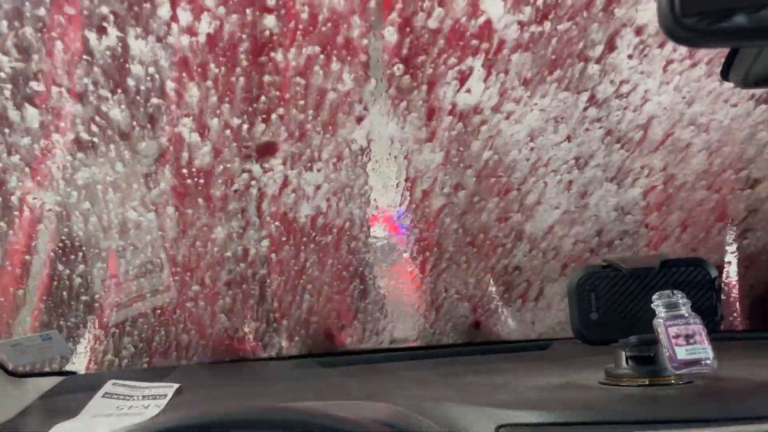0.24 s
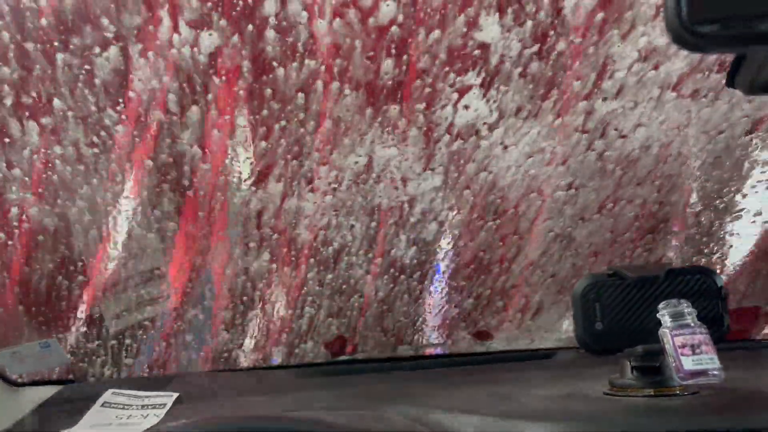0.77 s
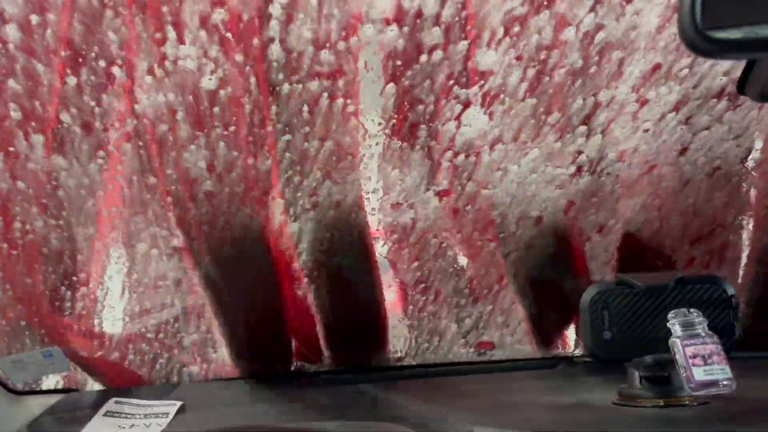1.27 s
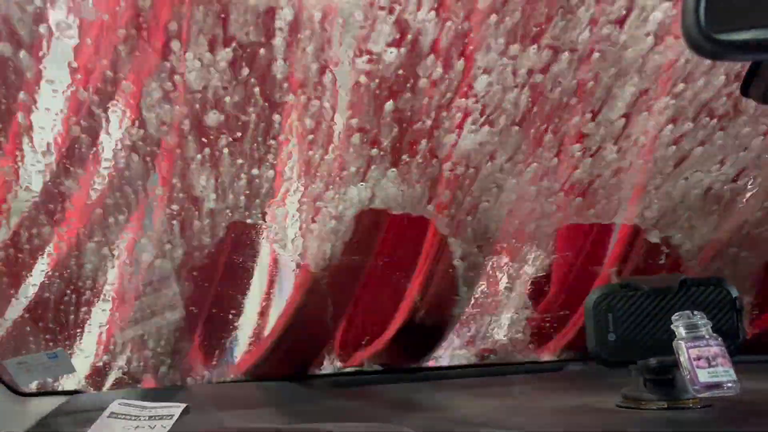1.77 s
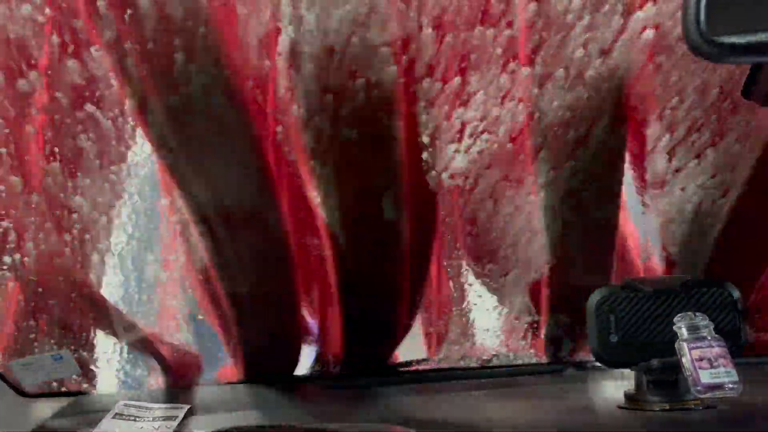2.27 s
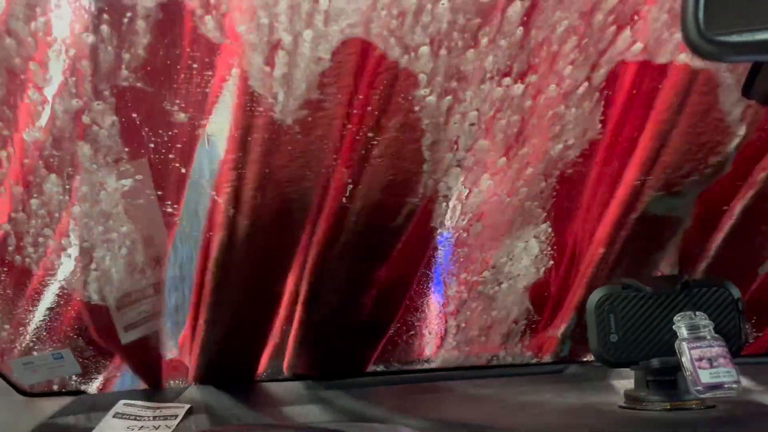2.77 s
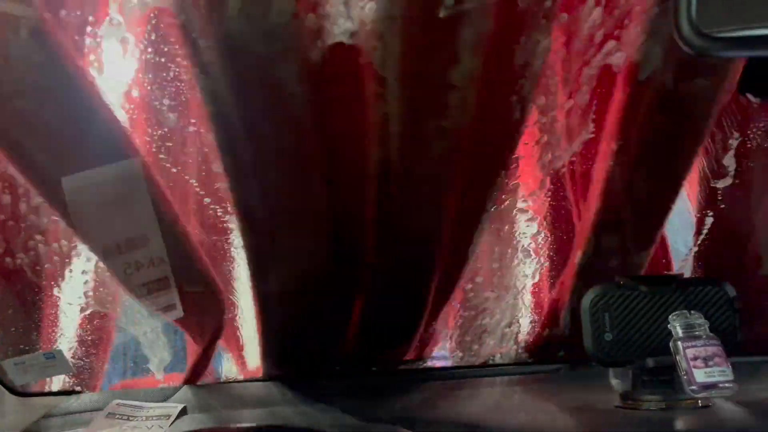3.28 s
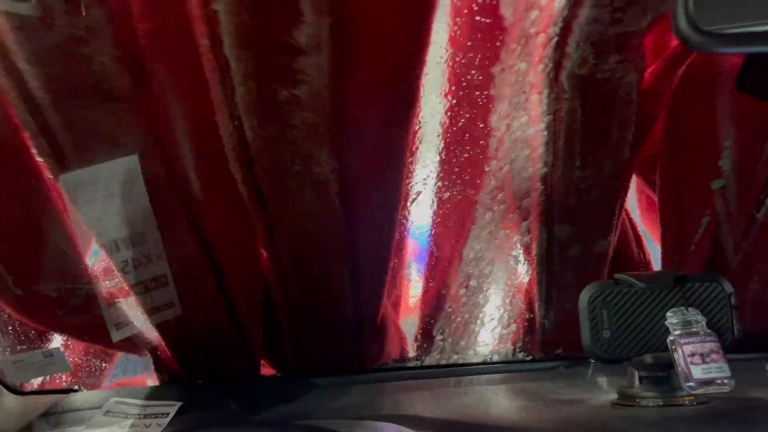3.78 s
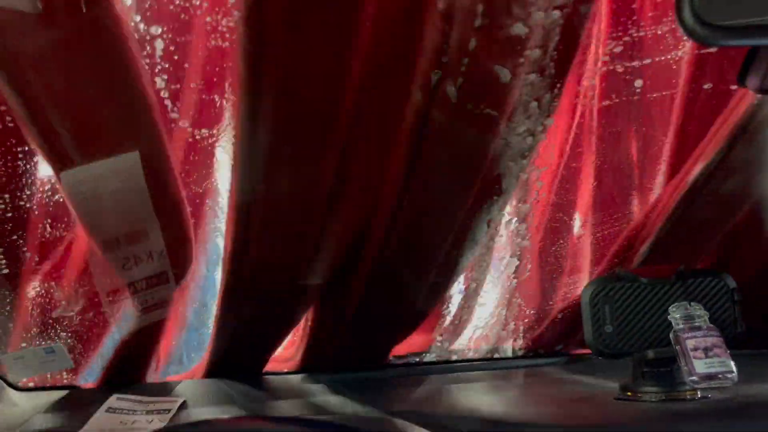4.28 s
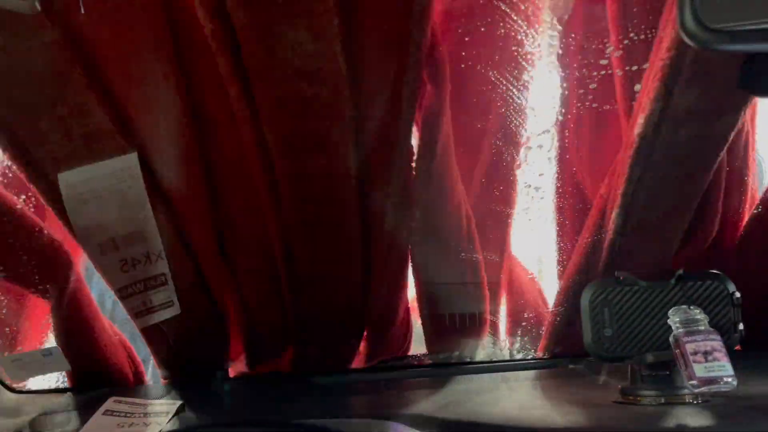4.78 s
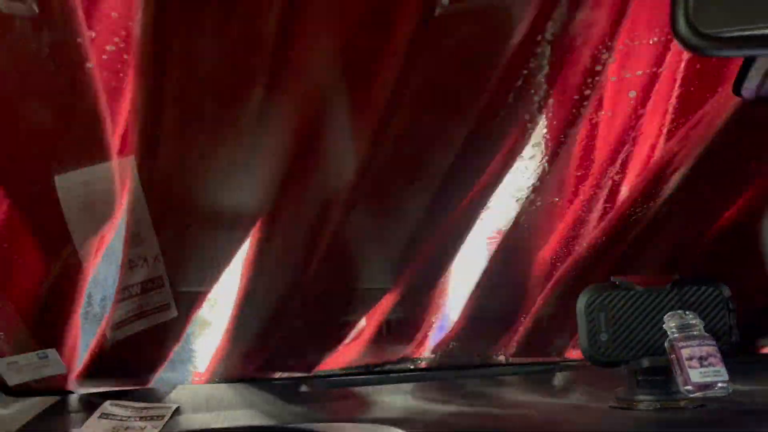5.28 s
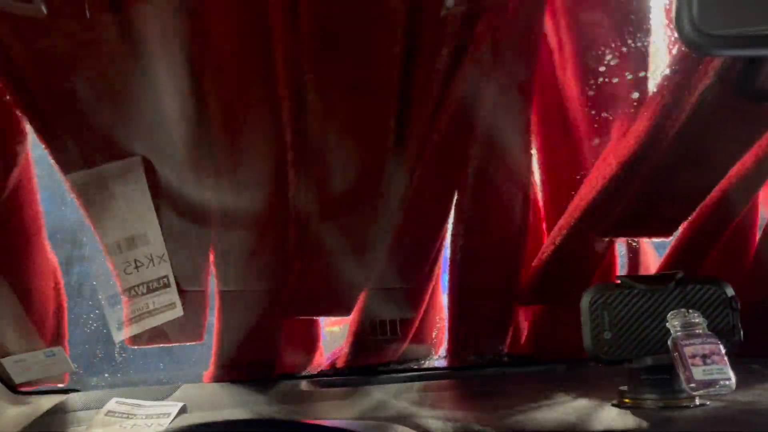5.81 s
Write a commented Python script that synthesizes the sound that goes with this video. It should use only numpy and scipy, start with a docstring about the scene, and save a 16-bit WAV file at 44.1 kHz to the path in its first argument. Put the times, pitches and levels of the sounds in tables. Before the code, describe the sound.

Inside a car in a wash, wet cloth strips slap and patter on the windscreen over deep body rumble, roof drumming and fading spray hiss.

```python
"""A rotating brush of wet cloth strips climbs from the bonnet over the windscreen, heard inside a car in a wash.
Soft random blows, filtered by the panels, make the body rumble and the roof drum; heavy bundles swing the metal.
Bursts of contacts with glass resonances make strip ends patter and slap; bundles of cloth crumple at their own pitch.
Water splashes in noise bursts, and the near spray hisses and moves away over the smooth hiss of far jets.
The bass is alike at both microphones, the treble comes from all round."""
import sys
import numpy as np
from scipy import signal
from scipy.fft import rfft, irfft
from scipy.io import wavfile
from scipy.ndimage import uniform_filter1d

SR = 44100
rng = np.random.default_rng(int(sys.argv[2]) if len(sys.argv) > 2 else 0)


def log_audio(samples):
    """Write samples as a 16-bit WAV file to the path given in sys.argv[1]."""
    # one column per channel
    frames = np.atleast_2d(samples).T
    # limit to full scale, then quantise
    limited = np.clip(frames, -1, 1)
    pcm = np.round(limited * 32767).astype(np.int16)
    wavfile.write(sys.argv[1], SR, pcm)


N = 266805
TIME = np.arange(N) / SR

# The brush climbs away from the body in surges, so both sink:
# (time [s], body rumble level [dB], level of cloth dragging on the bonnet [dB])
BODY_PRESS = [(0, -19.5, -32.5), (0.7, -18.5, -29), (1.6, -20, -33), (2.2, -23.5, -37.5),
              (2.72, -19.5, -28.5), (3.5, -24, -39), (4.3, -24, -31), (5.2, -29, -36.5), (5.65, -28.5, -27),
              (6.05, -29, -40)]
# Colour of cloth dragging on the bonnet: (frequency [Hz], level per Hz [dB])
BONNET_COLOUR = [(180, -20), (260, 1), (330, 1), (430, 2), (560, -4.5), (690, -3.5), (850, -11.5),
                 (1500, -19)]
# Windscreen resonances: (frequency [Hz], width [Hz], lift [dB])
GLASS_RESONANCES = [(854.5, 31, 12.5), (1012, 114, 10.5), (1784, 74, 7), (2370, 480, 4)]
# Colour of the cloth's snap, also of the ticking drops: (frequency [Hz], level per Hz [dB])
SNAP_COLOUR = [(700, -15), (1200, 3), (2600, -0.5), (3200, -3.5), (4600, -7), (6500, -29.5)]
# Colour of splashing water: (frequency [Hz], level per Hz [dB])
SPLASH_COLOUR = [(1900, 1), (4500, 0.5), (6500, -3.5), (9000, -4.5), (11000, -10)]
# Colour of the spray, near and far: (frequency [Hz], level per Hz [dB])
SPRAY_COLOUR = [(1200, 8.5), (2500, 7), (4000, 3.5), (5000, 2), (6000, 2), (7100, -0.5), (8700, 4.5),
                (9500, 0), (10500, -31)]


def undb(db):
    """Decibels to gain."""
    return 10 ** (np.asarray(db) / 20)


def unit(x):
    """Scale to an rms of 1."""
    return x / np.sqrt(np.mean(x ** 2))


def ride(times_s, levels_db):
    """Gain that follows a level curve, straight in dB between its points."""
    return undb(np.interp(TIME, times_s, levels_db))


def walk(rate):
    """Random levels held for 1 / rate seconds and smoothed twice; rms 1."""
    hold = int(SR / rate)
    steps = rng.standard_normal(1000)[np.arange(N) // hold % 1000]
    return unit(uniform_filter1d(uniform_filter1d(steps, hold), hold))


def bump(centre_s, width_s):
    """A smooth rise to 1 and back."""
    return np.exp(-((TIME - centre_s) / width_s) ** 2)


def fade(attack_s, t60):
    """Half a second of envelope: a quick rise, then an exponential decay."""
    t = TIME[:SR // 2]
    rise = 1 - np.exp(-(t / attack_s) ** 2)
    shape = rise * np.exp(-np.log(1000) * t / t60)
    return shape / shape.max()


def add(track, start_s, sound):
    """Lay a sound into a track."""
    i = max(int(start_s * SR), 0)
    track[..., i:i + sound.shape[-1]] += sound[..., :N - i]


def place(x, left_db):
    """Tilt the balance: positive makes the left louder than the right by this much."""
    return x * undb(np.array([[left_db], [-left_db]]) / 2)


def strength(x, db):
    """Scale a burst to the total energy of 14 ms at this level on two channels."""
    return x * undb(db) * np.sqrt(2 * .014 * SR) / np.linalg.norm(x)


def colour(x, points, modes=()):
    """Minimum-phase filter of unit power gain: a smooth (Hz, dB) slope with resonances on top."""
    size = 16384
    hz = np.maximum(np.arange(size // 2 + 1) * SR / size, 1)
    f, db = np.transpose(points)
    # outside the points the level falls 24 dB an octave, for two octaves at most
    octaves_below = np.maximum(np.log2(f[0] / hz), 0)
    octaves_above = np.maximum(np.log2(hz / f[-1]), 0)
    slope_db = np.interp(np.log(hz), np.log(f), db) - 24 * np.minimum(octaves_below + octaves_above, 2)
    for centre, width, lift in modes:
        slope_db = slope_db + lift / (1 + (2 * (hz - centre) / width) ** 2)
    # folding the cepstrum makes the filter causal
    cepstrum = irfft(np.log(undb(slope_db)))[:size // 2]
    cepstrum[1:] *= 2
    response = irfft(np.exp(rfft(cepstrum, size)))
    response /= np.linalg.norm(response)
    return signal.fftconvolve(x, response[None], axes=1)[:, :N]


def cabin(x, t60, direct):
    """The path from one spot to the two microphones: direct sound plus dense, short reflections."""
    size = 2048
    echoes = rng.standard_normal((2, size)) * fade(0.000053, t60)[:size]
    echoes /= np.linalg.norm(echoes, axis=1, keepdims=True)
    echoes[:, 0] += direct
    return signal.fftconvolve(x[None], echoes, axes=1)[:, :len(x)] / np.hypot(1, direct)


def blows(rate, scatter_db):
    """Contacts at random moments, rate a second on average, of uneven strength and random sign; rms 1."""
    lands = rng.random(N) < rate / SR
    size = undb(scatter_db * np.clip(rng.standard_normal(N), -2, 2))
    return unit(lands * size * rng.choice([-1, 1], N))


def contacts(rate, scatter_db, shared):
    """Tiny wet contacts spread over a surface; only a share of them reaches both microphones alike."""
    apart = np.array([blows(rate, scatter_db), blows(rate, scatter_db)])
    return unit(apart + shared * blows(rate, scatter_db))


def panel(points, rate, scatter_db, apart_hz, apart_db):
    """Soft blows on sheet metal; long waves reach both microphones alike, short ones do not."""
    common, apart = blows(rate, scatter_db), blows(rate, scatter_db)
    high_pass = signal.butter(1, apart_hz, "high", fs=SR, output="sos")
    apart = undb(apart_db) * signal.sosfilt(high_pass, apart)
    return unit(colour(np.array([common + apart, common - apart]), points))


def swing(hz, db, t60):
    """A struck panel swings at one pitch in a dying sine."""
    ring = fade(0.00097, t60)
    return undb(db) * ring * np.sin(2 * np.pi * hz * TIME[:len(ring)])


def burst(points, modes, attack_s, t60, flat=0):
    """A dense burst of contacts; the share of energy that lands flat cracks all at once."""
    push = fade(attack_s, t60)[:SR // 10]
    force = push * rng.standard_normal(len(push))
    force *= np.sqrt(1 - flat) / np.linalg.norm(force)
    force[np.argmax(push)] += np.sqrt(flat)
    return colour(cabin(force, t60=0.044, direct=0.44), points, modes)


def body_rumble():
    """Soft blows of the brush, filtered by the large panels, make the body rumble."""
    # Colour of the body: (frequency [Hz], level per Hz [dB])
    body_colour = [(22, -29.5), (30, -3), (40, -5), (54, 1), (75, -2.5), (100, -2.5), (135, -18)]
    times_s, rumble_db, _ = np.transpose(BODY_PRESS)
    rumble = panel(body_colour, rate=350, scatter_db=1.0, apart_hz=300, apart_db=-10)
    return rumble * ride(times_s, rumble_db)


def roof_drumming():
    """Denser blows drum on the roof, louder the harder the brush presses."""
    # Colour of the roof: (frequency [Hz], level per Hz [dB])
    roof_colour = [(70, -36), (100, -8), (118, 3), (132, 2.5), (146, -2.5), (170, -3), (200, -12.5),
                   (280, -13.5), (315, -17), (355, -12.5), (450, -20.5), (600, -25.5), (1000, -32.5)]
    # Press of the brush on the roof: (time [s], level [dB])
    roof_press = [(0, -18.5), (1.0, -23), (1.4, -21), (2.2, -22.5), (2.9, -21), (3.5, -24.5), (4.4, -22),
                  (4.8, -24), (5.05, -19.5), (5.68, -19.5), (6.05, -29.5)]
    drumming = panel(roof_colour, rate=550, scatter_db=2.5, apart_hz=420, apart_db=-2.0)
    return drumming * ride(*np.transpose(roof_press))


def thumps(mix_db=-9.5):
    """Heavy bundles of cloth land on the panels; the last lands squarely on the roof and rings its modes."""
    # Landings on a panel: (start [s], level before mix_db [dB], panel pitch [Hz])
    landings = [(0.086, -1.5, 50.4), (0.353, -12, 240), (0.679, 0.5, 72), (0.988, -7, 65.5),
                (1.595, -7.5, 194.4), (1.758, -1, 101.8), (2.577, -5, 33.3), (2.85, -13, 210),
                (4.434, -12, 229), (4.684, -5, 99), (5.148, -1.5, 129), (5.494, -8, 228)]
    # Roof modes under the square blow: (frequency [Hz], level before mix_db [dB])
    roof_modes = [(122, -3), (174, -2), (237, -31), (292, -7), (352, -5.5)]
    out = np.zeros(N)
    for start_s, db, hz in landings:
        add(out, start_s, swing(hz, db, t60=0.24))
    roof_blow = sum(swing(hz, db, t60=0.23) for hz, db in roof_modes)
    add(out, 5.694, roof_blow)
    return undb(mix_db) * out


def patter(strip_rate=17, strip_db=5.0, rub_db=-5, count=5):
    """Strip ends land on several parts of the glass, each with its own echoes; between them the cloth rubs on."""
    # Colour of cloth on glass: (frequency [Hz], level per Hz [dB])
    cloth_colour = [(250, -20), (370, -1), (480, 3), (740, 2), (930, -3), (1200, 5.5), (1600, -7),
                    (2400, -14), (3200, -18.5), (5000, -34), (9500, -53.5)]
    # Press of the brush on the windscreen: (time [s], level [dB])
    glass_press = [(0, -41.5), (1.6, -35.5), (2.2, -38.5), (2.85, -37), (3.7, -40.5), (4.3, -34.5),
                   (5.3, -34.5), (5.7, -34), (6.05, -40.5)]
    out = 0
    for _ in range(count):
        # overlapping landings add up in power
        landing_power = blows(strip_rate, strip_db) ** 2
        strips = signal.fftconvolve(landing_power, fade(0.0027, 0.12) ** 2)[:N]
        pressure = unit(np.sqrt(np.abs(strips))) + undb(rub_db)
        out = out + cabin(pressure * blows(4000, 3.1), t60=0.04, direct=0.42)
    return unit(colour(out, cloth_colour, GLASS_RESONANCES)) * ride(*np.transpose(glass_press))


def slap(knock_db, snap_db, snap_hz, attack_s, snap_q=3.1, wet_db=-24):
    """The pane knocks, lower under a harder blow; the cloth snaps at its own pitch and sheds a little water."""
    # Colour of the knock: (frequency [Hz], level per Hz [dB])
    knock_colour = [(300, -29.5), (700, -10.5), (880, 2.5), (1050, -5), (1300, -11.5), (3000, -30.5)]
    # Modes of the pane at the reference blow: (frequency [Hz], level against the knock [dB])
    pane_modes = [(885, -13.5), (1050, -14), (1723, -30.5)]
    reference_db, db_per_octave = -16, 52  # a blow softer by 52 dB raises the modes an octave
    flat = np.exp(-attack_s / 0.005)  # a strip that lands faster than about 5 ms cracks more
    pitch = 2 ** ((reference_db - knock_db) / db_per_octave)

    rattle = burst(knock_colour, GLASS_RESONANCES, attack_s, t60=0.062)
    ring = 0
    for hz, db in pane_modes:
        mode = swing(hz * pitch, 0, t60=0.083)[:rattle.shape[1]]
        ring = ring + strength(mode, knock_db + db)
    knock = strength(rattle, knock_db - 3.5) + ring

    fold = signal.iirpeak(snap_hz, snap_q, fs=SR)  # air squeezed from under a fold of cloth
    crack = burst(SNAP_COLOUR, (), attack_s, t60=0.054, flat=flat)
    snap = strength(signal.lfilter(*fold, crack), snap_db)
    water = strength(burst(SPLASH_COLOUR, (), attack_s, t60=0.045, flat=flat), snap_db + wet_db)
    return place(knock, -1.0) + place(snap + water, 1.0)


def slaps(lead_s=.003, flat_s=0.002776, glance_s=0.0002806):
    """Hard hits on the glass; those with a weaker snap glance, landing glance_s slower per dB."""
    # Hits of wet strips: (time [s], knock of the pane [dB], snap of the cloth [dB], snap pitch [Hz])
    hits = [(0.051, -30.5, -28.5, 1370), (0.139, -29.5, -38, 1580), (0.233, -44.5, -33.5, 1730),
            (0.318, -29, -36, 1300), (0.439, -30.5, -37.5, 1300), (0.507, -32, -36.5, 1390),
            (0.661, -35.5, -41, 1880), (0.696, -33.5, -37.5, 1620), (0.977, -36, -33.5, 2000),
            (1.171, -25, -39.5, 1310), (1.395, -24, -30.5, 1270), (1.675, -34.5, -38, 1560),
            (1.754, -32.5, -39, 1490), (2.117, -40, -35.5, 1350), (2.157, -36, -26, 1720),
            (2.287, -27, -39, 1360), (2.532, -34.5, -35.5, 2120), (2.602, -28, -35.5, 1400),
            (2.742, -36, -35, 1900), (2.91, -26.5, -40.5, 1310), (3.015, -38.5, -37, 1660),
            (3.347, -46, -36.5, 1450), (3.425, -34, -27, 1360), (3.835, -32.5, -42, 1240),
            (4.188, -23, -41.5, 1200), (4.299, -32, -39, 1230), (4.393, -32.5, -37, 1900),
            (4.434, -29.5, -41, 1400), (4.465, -30.5, -33, 1630), (4.517, -26.5, -39.5, 1500),
            (4.617, -15, -28.5, 1720), (4.678, -32, -36.5, 1370), (4.736, -30.5, -33, 1260),
            (4.782, -32, -42.5, 1390), (4.822, -39, -41, 1690), (4.864, -32.5, -34, 2000),
            (4.931, -27.5, -33, 1480), (4.974, -28.5, -35, 1500), (5.04, -29.5, -40, 1280),
            (5.081, -27.5, -35, 1490), (5.208, -32, -37, 1840), (5.359, -29.5, -41.5, 1200),
            (5.437, -24, -33, 1250), (5.451, -22.5, -30.5, 1360), (5.529, -30.5, -33, 1360),
            (5.57, -36.5, -38.5, 2200), (5.682, -22.5, -38, 1200)]
    out = np.zeros((2, N))
    hardest_db = max(row[2] for row in hits)
    for hit_s, knock_db, snap_db, snap_hz in hits:
        slide_s = glance_s * (hardest_db - snap_db)
        sound = slap(knock_db, snap_db, snap_hz, flat_s + slide_s)
        add(out, hit_s - lead_s - slide_s / 2, sound)  # the edge touches first
    return out


def crumples(attack_s=0.0031, t60=0.35, fold_q=3.4):
    """Bundles fold up as they land, each in a rush of soft contacts that dies away at a pitch of its own."""
    # Folding bundles: (start [s], level [dB], pitch [Hz])
    bundles = [(0.5, -25.5, 470), (1.387, -30, 410), (1.66, -28.5, 440), (1.754, -26, 394),
               (2.719, -26.5, 543), (3.025, -24.5, 500), (4.32, -26, 440), (4.498, -32, 494),
               (5.446, -22.5, 420), (5.693, -28, 400)]
    out, push = np.zeros((2, N)), fade(attack_s, t60)
    cloth = colour(contacts(1500, 0.54, shared=0.46), BONNET_COLOUR)
    for start_s, db, hz in bundles:
        rush = unit(signal.lfilter(*signal.iirpeak(hz, fold_q, fs=SR), cloth))
        piece = np.roll(rush, -int(start_s * SR), axis=1)[:, :len(push)]
        add(out, start_s, undb(db) * push * piece)
    return out


def bonnet_scrub(drag_db=3.0):
    """Wet cloth drags over the bonnet: dense contacts whose level wanders in uneven strokes."""
    times_s, _, bonnet_db = np.transpose(BODY_PRESS)
    strokes = contacts(1500, 1.8, shared=0.41) * undb(drag_db * walk(23.9))
    return unit(colour(strokes, BONNET_COLOUR)) * ride(times_s, bonnet_db)


def splashes(attack_s=0.0072, t60=0.043):
    """Water flung on to the glass bursts into droplets that rain on for a moment."""
    # Splashes: (time [s], level [dB])
    flung = [(0.034, -35), (0.052, -32.5), (0.088, -38.5), (0.138, -40), (0.278, -42.5), (0.377, -48),
             (0.594, -46), (1.396, -43), (1.675, -45.5), (2.769, -47), (4.616, -44.5), (4.864, -50),
             (4.974, -55), (5.081, -52.5), (5.45, -52.5), (5.529, -52), (5.568, -40)]
    out = np.zeros((2, N))
    for splash_s, db in flung:
        add(out, splash_s - attack_s, strength(burst(SPLASH_COLOUR, (), attack_s, t60), db))
    return out


def spray(flutter_db=2.5, jet_db=0.0):
    """Droplets all over the glass and a jet on one spot, in sheets that the strips keep breaking up."""
    jet = cabin(blows(12000, 8.8), t60=0.013, direct=1.0)
    drops = contacts(14000, 3.8, shared=0.1) + undb(jet_db) * jet
    return unit(colour(drops * undb(flutter_db * walk(40)), SPRAY_COLOUR))


def ticks(rate=30, scatter_db=4.0):
    """Single fat drops in the spray tick on the glass."""
    drops = cabin(blows(rate, scatter_db), t60=0.059, direct=0.5)
    return unit(colour(drops, SNAP_COLOUR, GLASS_RESONANCES))


def near_water(ticks_db=-5.5):
    """Spray and ticks sink together as the spray moves off; one sheet of water sweeps over the glass."""
    near_db, far_db, leaves_s = -46.5, -60.5, 3.38  # level at first, level once far, time constant
    level_db = far_db + (near_db - far_db) * np.exp(-TIME / leaves_s)
    sheet_db = 4 * bump(centre_s=0.89, width_s=0.17)
    return (spray() + undb(ticks_db) * ticks()) * undb(level_db + sheet_db)


def far_jets():
    """From jets further along the car the droplets merge into a smooth hiss of filtered noise."""
    # Hiss of the far jets: (time [s], level [dB])
    jet_levels = [(2.0, -60.5), (2.9, -58), (4.15, -53), (4.45, -62)]
    hiss = unit(colour(rng.standard_normal((2, N)), SPRAY_COLOUR))
    return hiss * ride(*np.transpose(jet_levels))


def scene():
    """Body, roof, glass and water together, as heard from the front seat."""
    roof = roof_drumming() + thumps()
    metal = place(body_rumble(), 1.6) + place(roof, 3.95) + place(bonnet_scrub(), -1.5)
    glass = place(patter(), -0.44) + slaps()
    water = place(near_water() + far_jets() + splashes(), 1.8)
    return metal + glass + crumples() + water


def record(dry):
    """A steep elliptic low-pass cuts the top above 9750 Hz."""
    return signal.sosfilt(signal.ellip(10, .2, 70, 9750, fs=SR, output="sos"), dry)


dry = scene()
out = record(dry)
log_audio(out)
```